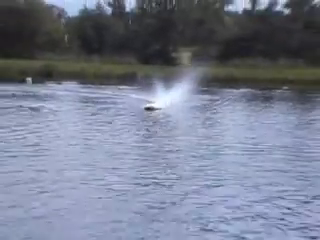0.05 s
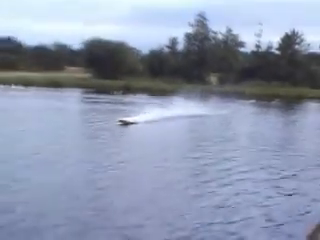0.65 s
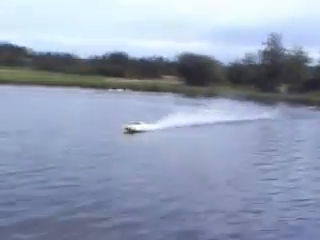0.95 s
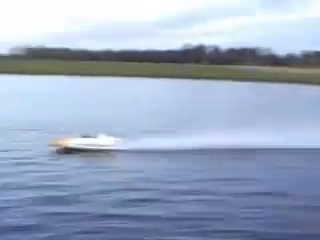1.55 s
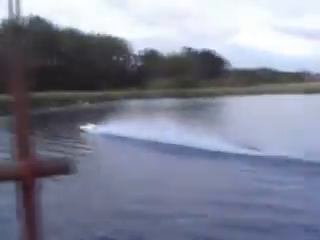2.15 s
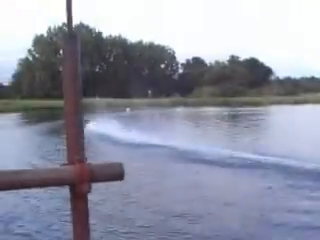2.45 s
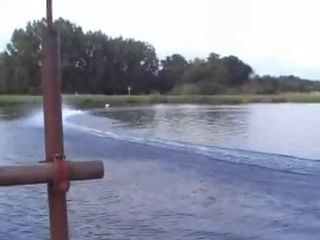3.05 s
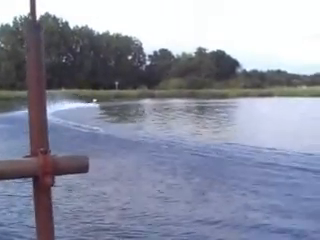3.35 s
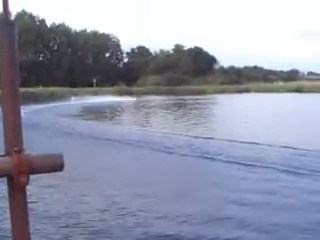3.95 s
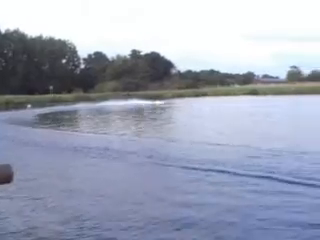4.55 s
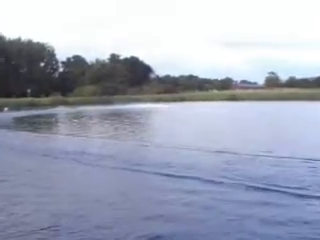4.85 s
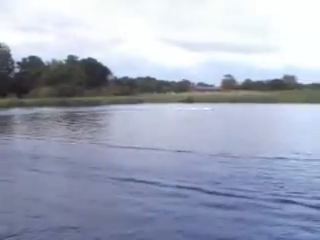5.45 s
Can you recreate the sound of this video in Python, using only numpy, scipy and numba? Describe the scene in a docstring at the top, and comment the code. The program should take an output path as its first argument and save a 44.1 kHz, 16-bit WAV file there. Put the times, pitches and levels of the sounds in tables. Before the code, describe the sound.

High, raspy buzz of a small model boat engine racing across a lake, wavering, brightest as it passes, then lower and fainter.

```python
"""A model speedboat races in across a lake, its two-stroke engine buzzing over a hissing wake. Each firing
cracks out of the exhaust, bounces back from the end of the tuned pipe and scatters in the spray; the revs
jump whenever the propeller skips. At about 1.7 s the boat passes close, at its brightest. Then the pitch
sinks as it turns away and labours, picking up a little at the end. All along the far bank answers faintly
and puffs of breeze brush the microphone."""
import sys
import numpy as np
from scipy import signal
from scipy.fft import rfft, irfft, next_fast_len
from scipy.io import wavfile
from scipy.ndimage import uniform_filter1d, map_coordinates
from numba import njit

SR = 44100
rng = np.random.default_rng(int(sys.argv[2]) if len(sys.argv) > 2 else 0)


def digitize_waveform(pressure):
    """Quantize a signal to 16-bit integers and store it at the path in sys.argv[1].

    Rows of a 2-D input are taken as channels; values are limited to [-1, 1].
    """
    field = np.atleast_2d(pressure).T
    bounded = np.clip(field, -1, 1)
    quanta = np.round(bounded * 32767).astype(np.int16)
    wavfile.write(sys.argv[1], SR, quanta)


N = 247401
TIME = np.arange(N) / SR

# puffs of breeze on the microphone: middle t/s, length/s, level/dB
BREEZE_PUFFS = [(.25, 0.7, -34.5), (1.5, 0.84, -52), (2.867, 0.21, -40), (4.15, 0.5, -60),
                (5.244, 1.5, -43.5)]
# rumble of the breeze: f/Hz, gain/dB
BREEZE_EQ = [(25, -14), (70, 6.5), (125, -17), (170, -17), (300, -17.5)]
# tone of the far bank's echo: f/Hz, gain/dB
BANK_EQ = [(200, -22), (1200, -33), (3000, -30), (5000, -20), (11000, -18)]
# rush of the wake: f/Hz, gain/dB
WAKE_EQ = [(30, -49), (70, -48), (110, -30), (160, -4), (300, -4), (450, 0), (620, 2.5), (850, 0),
           (1300, -3), (2100, -5), (4000, -5), (7000, -30), (11000, -31)]
# a notch that sweeps as the boat swings: t/s, f/Hz, depth/0-1
HOLLOW_SWEEP = [(0, 2380, 0), (.7, 2360, 0.3), (1.0, 2240, .5), (1.15, 1890, .7), (1.45, 1890, 0.24),
                (1.8, 2006, 0.33), (2.25, 1990, 0), (2.5, 2075, .95), (3.45, 2054, 0.98), (3.7, 2117, 0.52),
                (4.1, 2032, 0.93), (4.5, 2144, 0.44), (5.0, 2275, .6), (5.61, 2288, 0)]
# the run: t/s, spray scatter/dB, gas noise/dB, churn in the bark/dB, stern to shore/0-1, wake level/dB
RUN_CUES = [(0, -9, 2.5, -4.5, 0.13, -31.5), (.5, -9, 8, -2.5, 0.28, -29.5),
            (.6, -8.5, 4, -19, 0.28, -35.5), (.75, -13.5, 7, -24, 0.24, -39), (.9, -8.5, 3, -2, 0.26, -31),
            (1.15, -5, 3, -8, 0.28, -32.5), (1.5, -6, 7.5, -12, 0.3, -30), (1.8, -8, 0, -5.5, 0.2, -29.5),
            (2.05, -7.5, -3.5, -16, 0.58, -35.5), (2.3, -2, 2.5, -23, 0.2, -39),
            (2.55, -7.5, -1.5, -11, 0.19, -43), (2.9, -6.5, -2.5, -29, 0.38, -32.5),
            (3.3, -16.5, -2, -30, 0.5, -41.5), (3.55, -4.5, -10, -37, 1, -47),
            (3.68, -8.5, -3, -16, 0.9, -48), (3.85, -8.5, -9, -22.5, 0.9, -47.5),
            (4.18, -9.5, -5, -28, 0.83, -52.5), (4.4, -13, -5, -16, 0.94, -47.5),
            (5.1, -15.5, -1, -6, 0.87, -44), (5.61, -10.5, 1, -5, 0.5, -38.5)]
# firing rate as heard while the propeller grips, falling in the pass and the turn: t/s, f/Hz
FIRING_RATE = [(0.0, 224.6), (0.53, 218.6), (0.72, 226.3), (1.06, 241.4), (1.26, 237.7), (1.46, 245.0),
               (1.72, 244.4), (1.86, 233.4), (2.1, 230.3), (2.3, 233.2), (2.41, 218.8), (2.68, 211.5),
               (2.77, 203.3), (3.02, 194.9), (3.39, 177.0), (3.66, 175.2), (3.82, 181), (4.18, 182.9),
               (4.43, 171.8), (4.74, 177.6), (5.08, 188.2), (5.61, 192.3)]
# the propeller skips clear of a ripple: t/s, rev rise/Hz, recovery/s, exhaust gain/dB
PROP_SKIPS = [(0.084, 6.3, 0.047, 1), (0.163, 3.06, 0.03, 0), (0.246, 7.4, 0.12, -3.5),
              (0.327, 13.7, 0.22, -0.8), (0.555, 11.1, 0.12, 1.5), (0.826, 9.4, 0.048, 1),
              (0.984, 6.16, 0.04, 3), (1.095, 19, 0.067, 0), (1.329, 7, 0.2, 1.5), (1.619, 5.8, 0.071, 0),
              (1.683, 3.35, 0.12, 1.5), (1.89, 7.8, 0.2, -0.5), (2.047, 3.9, 0.049, 0.5),
              (2.595, 3.52, 0.1, 0), (2.72, 4.74, 0.12, 0), (2.84, 5.94, 0.079, -2),
              (2.971, 2.98, 0.053, -1), (3.113, 5.9, 0.136, 0), (3.322, 4.75, 0.041, 1.0),
              (3.443, 4.5, 0.13, 1), (3.568, 5.34, 0.092, 0), (3.744, 8.8, 0.075, 7.5),
              (3.955, 3.84, 0.045, 0), (4.635, 6.3, 0.14, 1.5), (4.803, 6.4, 0.081, 1.0),
              (4.977, 2.42, 0.036, 2.5)]
# single harmonics that whine out as the hull swings: middle t/s, length/s, f/Hz, level/dB
WHINE_CUES = [(0.63, 0.23, 2030, -33), (1.964, 0.2, 3540, -27.5), (1.916, 0.17, 7400, -16),
              (1.8, 0.2, 4200, -17), (2.224, 0.12, 3490, -18), (2.303, 0.11, 4190, -16.5),
              (2.286, 0.22, 4650, -19), (2.93, 0.12, 5300, -31), (4.06, 0.24, 6170, -43),
              (5.22, 0.79, 5110, -42), (4.9, 0.46, 5800, -36), (5.37, 0.52, 1530, -38),
              (5.55, 0.86, 1905, -34)]
# hum of the smooth exhaust flow: t/s, then level/dB for each of harmonics 1-4
DRONE_LEVELS = [(0.0, -25, -50, -25.5, -54), (0.1, -29, -44, -28.5, -63), (0.17, -26, -43, -20.5, -61),
                (0.24, -27, -46, -31, -53), (0.32, -28, -42, -31, -56), (0.39, -26, -37, -23, -50),
                (0.51, -32, -53, -28, -44), (0.58, -30, -47, -44, -63), (0.95, -32, -40, -34, -42.5),
                (1.5, -34.5, -35, -31.5, -60), (1.89, -28.5, -39, -38, -35), (1.98, -39, -45, -32.5, -55),
                (2.25, -45, -34.5, -43, -32), (2.52, -55, -44.5, -42, -52), (2.78, -41.5, -40.5, -38, -59),
                (2.93, -37, -40, -32.5, -33.5), (3.12, -36, -43.5, -40.5, -39), (3.3, -39, -50, -52, -46),
                (3.8, -45, -54.5, -47.5, -48.5), (4.4, -48.5, -56, -47, -48.5),
                (4.9, -53.5, -46.5, -49.5, -63), (5.3, -39.5, -41, -47.5, -51),
                (5.61, -34.5, -38, -62, -75)]
# the bouncing hull shakes the drone: t/s, roughness/0-1
HULL_SHAKE = [(0, .24), (.48, .24), (.62, .08), (.9, .15), (1.3, .22), (1.45, .5), (1.78, .45), (1.9, .14),
              (2.9, .18), (3.3, .08), (5.61, .12)]
# returns inside the tuned pipe: delay/round trips, gain/linear
PIPE_RETURNS = [(0.315, 0.04), (0.843, 0.0083), (0.998, 0.43), (1.158, 0.052), (1.634, 0.037),
                (1.997, 0.059)]
# the water mirrors the exhaust: t/s, delay/ms, gain/linear
WATER_MIRROR = [(0, 0.55, 0.18), (.7, 0.41, 0.058), (.95, 0.27, 0.23), (2.0, 0.31, 0.15),
                (2.42, 0.706, 0.22), (2.9, 0.75, 0.18), (3.9, 0.466, 0.24), (4.6, 0.35, 0.021),
                (5.61, 0.29, 0.089)]
# silencer resonances as heard once the boat has passed: f/Hz, width/Hz, bow gain/dB, stern gain/dB
SILENCER_MODES = [(805, 2300, -14.5, 1.5), (1089.6, 84, 14, -0.5), (1528, 338, 10.5, 19.5),
                  (1908, 150, 8.5, 12.5)]
# tone of the outlet: f/Hz, bow gain/dB, stern gain/dB
OUTLET_EQ = [(300, -69, -36.5), (1490, -51, -23), (2060, -50, -1.5), (2090, -14, -22), (2163, 6.5, -1),
             (2470, -4.5, -1.5), (3280, 0, -2.5), (3710, -5, 0), (4380, -6, 1.5), (5430, -3, 3),
             (5640, -6.5, 5), (6240, -4, 5), (7550, -10, -4), (7760, -30, -9.5), (9900, -48.5, -33.5)]
# modes of the thin pipe wall as heard once the boat has passed: f/Hz, width/Hz, gain/linear
WALL_MODES = [(2740, 160, 0.32), (3190, 240, -0.29), (3810, 140, 0.12), (4226, 150, 0.48), (5400, 55, 0.15),
              (7020, 140, 0.26), (7900, 120, 0.25)]
# a metallic ring in the rasp that slides as the hull swings: t/s, f/Hz, gain/linear
LOW_RING_SWEEP = [(0, 4390, 0.6), (.2, 4660, 1.5), (.3, 5070, 0.46), (.5, 4200, 0.4), (.66, 4950, 0.35),
                  (.82, 4170, 0.24), (.97, 4300, 1.1), (1.1, 3550, 0.79), (1.22, 3400, 1.3),
                  (1.25, 5507, 0.096), (1.3, 5300, 1), (1.4, 4187, 1.37), (1.55, 3860, 0.93),
                  (1.8, 3692, 0.95), (1.95, 3484, 0.24), (2.05, 4140, 1.01), (2.2, 4300, 0.75),
                  (2.32, 4722, 0.98), (2.45, 4200, 0.45), (2.86, 4597, 0.13), (2.9, 4590, 1.7),
                  (3.25, 4750, 0.96), (3.5, 5035, 1.06), (3.85, 4996, 0.27), (4.12, 4776, 0.83),
                  (4.4, 4790, .1), (4.7, 5030, .4), (5.61, 5030, 0.75)]
# a second, shriller ring: t/s, f/Hz, gain/linear
HIGH_RING_SWEEP = [(0, 5800, 0.37), (.35, 6200, .7), (.6, 6090, .7), (.75, 6890, 0.38), (.86, 6300, 0.49),
                   (.96, 6950, 0.76), (1.1, 6600, .6), (1.2, 6150, 0.46), (1.31, 6800, 0.81),
                   (1.45, 5806, 0.37), (1.7, 6450, 0.64), (1.9, 6460, 0.5), (2.08, 5953, 1),
                   (2.25, 5400, .3), (2.38, 5876, 0.91), (2.9, 5900, 1), (3.15, 5860, .7),
                   (3.45, 6340, 0.61), (4.1, 6240, 0.51), (4.45, 7240, 0.51), (4.8, 6300, 0.65),
                   (5.61, 6230, 0.28)]
# tone of the finest crackle, the rushing gas and the bark: f/Hz, gain/dB
SIZZLE_EQ = [(1500, -81), (6000, -18), (7500, 1), (8500, 1.5), (9800, 0.5), (11000, -5), (11800, -14.5)]
GAS_EQ = [(1200, -26), (2400, -13.5), (4200, -6), (6000, -4), (8500, 0)]
BARK_EQ = [(100, -23), (250, -4.5), (800, 19.5), (2150, 12.5), (2600, 6.5)]
# ripples take the top off the water's reflection: f/Hz, gain/dB
MIRROR_EQ = [(7000, 0), (11000, -6)]
# exhaust mix ahead of the skips: t/s, bark level/dB, rasp level/dB, sizzle level/dB
EXHAUST_FADERS = [(0.0, -25.5, -18, -30), (0.109, -26.5, -20.5, -35.5), (0.16, -21, -16.5, -31.5),
                  (0.66, -23, -17, -24), (0.76, -24.5, -19.5, -26), (0.951, -23.5, -16.5, -23.5),
                  (1.5, -24.5, -17.5, -23.5), (1.781, -23.5, -12, -15), (1.93, -23, -8.5, -15.5),
                  (2.2, -24.5, -12.5, -18), (2.28, -23, -15, -22.5), (2.384, -22, -15.5, -22.5),
                  (2.41, -23, -18.5, -31.5), (2.7, -23.5, -21.5, -32.5), (2.87, -25, -19, -31),
                  (2.91, -35, -17.5, -34), (3.15, -27, -19.5, -30), (3.449, -31, -19, -41),
                  (3.899, -34.5, -19.5, -34.5), (4.499, -38.5, -22.5, -33.5), (4.899, -34.5, -22, -33),
                  (5.35, -34.5, -19.5, -32), (5.61, -32.5, -20.5, -29.5)]
# stereo width: f/Hz, side minus mid/dB
SIDE_EQ = [(100, -24), (400, -22), (1100, -21), (3600, -23), (4500, -26), (7000, -36), (8200, -6),
           (9300, -24), (11500, -34)]
# pan, slightly to the right: t/s, left minus right/dB
PAN = [(0, -.55), (1.2, -.3), (3.2, -.6), (3.75, -1.3), (4.25, -1.4), (4.75, -.2), (5.3, -.7)]

RECEDING_TRIP_MS = 2.6  # round trip of a pulse in the tuned pipe, as heard once the boat has passed
APPROACH_SQUEEZE, PASS_AT_S, PASS_FADE_S = .078, 1.71, .55  # racing in shortens that trip by this share
BOB_HZ, BOB_DB, BOB_CREST_S, STRAIGHT_ENDS_S = 2.88, 3.5, .21, 2.0  # the hull porpoises on the straight


def undb(db):
    """Decibels to gain."""
    return 10 ** (np.asarray(db) / 20)


def curves(table):
    """One automation curve per column, in straight ramps over time."""
    times, *columns = np.transpose(table)
    return [np.interp(TIME, times, column) for column in columns]


def swell(middle, length):
    """A rounded fade in and out."""
    return np.maximum(1 - (2 * (TIME - middle) / length) ** 2, 0)


def unit(x):
    """Scale to rms 1."""
    return x / np.sqrt(np.mean(x ** 2))


def steady(x):
    """Ride the gain to hold rms 1 over every few dozen milliseconds."""
    power = uniform_filter1d(uniform_filter1d(x ** 2, size=1800), size=1800)
    return x / np.sqrt(np.maximum(power, 1e-14))


def walk(rate):
    """Smoothed random modulation, rms 1, with `rate` new values a second."""
    hold = int(SR / rate)
    held = np.repeat(rng.standard_normal(4096), hold)[:N]
    return unit(uniform_filter1d(uniform_filter1d(held, hold), hold))


def delay(x, ms):
    """A delay line whose time may move."""
    return map_coordinates(x, [np.arange(N) - ms * SR / 1000], order=3)


def eq(x, points):
    """Minimum-phase equaliser through (f/Hz, gain/dB) points."""
    hz, db = np.transpose(points)
    size = 4096
    grid = np.maximum(np.arange(size // 2 + 1) * SR / size, 1)
    cepstrum = irfft(np.log(undb(np.interp(np.log(grid), np.log(hz), db))))
    cepstrum[1:size // 2] *= 2
    cepstrum[size // 2 + 1:] = 0
    return signal.fftconvolve(x, irfft(np.exp(rfft(cepstrum))))[:N]


@njit
def bandpass(x, hz, width_hz):
    """Sweepable state-variable band-pass."""
    y, band_state, low_state = np.empty(len(x)), 0., 0.
    for i in range(len(x)):
        g, damping = np.tan(np.pi * hz[i] / SR), width_hz / hz[i]
        band = (band_state + g * (x[i] - low_state)) / (1 + g * (g + damping))
        band_state, low_state = 2 * band - band_state, low_state + 2 * g * band
        y[i] = damping * band
    return y


def breeze():
    """Light puffs of wind rumble on the microphone."""
    rumble = unit(eq(rng.standard_normal(N), BREEZE_EQ))
    return rumble * sum(undb(db) * swell(at, length) for at, length, db in BREEZE_PUFFS)


def far_bank(boat, t60_s=2.3, predelay_s=.04):
    """A faint, thin echo from the trees round the lake."""
    t = TIME[:SR]
    tail = rng.standard_normal(SR) * undb(-60 * t / t60_s) * (t > predelay_s)
    echo = signal.fftconvolve(boat, tail / np.sqrt(np.sum(tail ** 2)))[:N]
    return eq(echo, BANK_EQ)


def wake(level_db, surge_db=1.8):
    """Thrown water rushes unevenly as the hull skips over the ripples."""
    rush = unit(eq(rng.standard_normal(N), WAKE_EQ))
    return rush * undb(level_db + surge_db * walk(14))


def hollow(boat):
    """A moving notch scoops out the upper mids as the boat swings."""
    hz, depth = curves(HOLLOW_SWEEP)
    return boat - np.clip(depth, 0, 1) * bandpass(boat, hz, width_hz=340.)


def whines(turns, firing_hz, waver_db=2):
    """For a moment the engine harmonic nearest each cued pitch sings out."""
    tones = 0
    for at, length, hz, db in WHINE_CUES:
        harmonic = np.round(hz / np.interp(at, TIME, firing_hz))
        envelope = swell(at, length) * undb(db + waver_db * walk(40.9))
        tones = tones + envelope * np.sin(2 * np.pi * harmonic * turns)
    return np.sqrt(2) * tones


def drone(turns, scatter_db):
    """The pulsing exhaust flow hums on four low harmonics that throb and shake as the hull bounces."""
    levels = curves(DRONE_LEVELS)
    on_straight = np.clip((STRAIGHT_ENDS_S - TIME) * 20, 0, 1)
    levels[0] += BOB_DB * on_straight * np.cos(2 * np.pi * BOB_HZ * (TIME - BOB_CREST_S))
    waver_db = 3.2 * undb(scatter_db / 2)  # deeper in broken water
    rough = curves(HULL_SHAKE)[0]
    # flat out, strong and weak firings alternate: a faint sub-octave
    tones = undb(-48) * swell(middle=1.4, length=.97) * walk(25) * np.sin(np.pi * turns)
    for harmonic, db in enumerate(levels, 1):
        shake = (1 + rough * (walk(110) + 1j * walk(70))) / np.sqrt(1 + 2 * rough ** 2)
        tone = np.imag(shake * np.exp(2j * np.pi * harmonic * turns))
        tones += undb(db + waver_db * walk(21.85)) * tone
    return np.sqrt(2) * tones


def propeller_skips(rise_s=.053):
    """The propeller loses its grip: extra revs (Hz) and a briefer change in exhaust level (dB)."""
    races = np.array([np.interp(TIME - at, [-rise_s, 0, recovery], [0, 1, 0])
                      for at, _, recovery, _ in PROP_SKIPS])
    _, rise_hz, _, gain_db = np.transpose(PROP_SKIPS)
    return rise_hz @ races, gain_db @ races ** 2


def scatter(x, spread_ms, rate, taps=16):
    """Short reflections off hull, ripples and spray, each fading in and out."""
    lags = (np.arange(taps) + rng.random(taps)) / taps
    return unit(sum(np.roll(x, int(lag * spread_ms * SR / 1000) + 2) * walk(rate) * np.exp(-lag)
                    for lag in lags))


def firings(turns, jitter_ms, spread_db):
    """One sharp pressure pulse per engine turn, each a little different in timing and punch."""
    timing, punch = rng.standard_normal((1400, 2))[:int(turns[-1])].T
    centres = np.interp(np.arange(len(timing)) + 1, turns, np.arange(N)) + timing * jitter_ms * SR / 1000
    samples = centres.astype(int)[:, None] + np.arange(-7, 9)
    offset = samples - centres[:, None]
    clicks = np.sinc(offset) * np.sinc(offset / 8) * undb(spread_db * punch[:, None])
    return unit(np.bincount(np.clip(samples, 0, N - 1).ravel(), clicks.ravel(), N))


def tuned_pipe(blast, trip_ms):
    """The blast with its returns from inside the pipe, then its bounce off the water."""
    piped = unit(blast + sum(gain * delay(blast, share * trip_ms) for share, gain in PIPE_RETURNS))
    mirror_ms, mirror_gain = curves(WATER_MIRROR)
    return unit(piped + mirror_gain * delay(eq(piped, MIRROR_EQ), mirror_ms))


def exhaust_crack(turns, trip_ms, scatter_db, gas_db):
    """Firings and bright gas noise cross the pipe and scatter; returns the crack and the raw gas puffs."""
    pulses = firings(turns, jitter_ms=.008, spread_db=.6)
    # gas rushes while the port is open and never quite stops
    puffs = (np.exp(-(turns % 1) / .25) + .5) * rng.standard_normal(N)
    direct = tuned_pipe(pulses + undb(gas_db) * unit(eq(puffs, GAS_EQ)), trip_ms)
    off_spray = undb(scatter_db) * scatter(direct, spread_ms=1.7, rate=18)
    off_hull = undb(-11) * scatter(direct, spread_ms=4.5, rate=11)
    return direct + off_spray + off_hull, puffs


def silencer_bark(turns, trip_ms, doppler, puffs, churn_db, astern):
    """The even body of each blast, roughened by churning water at the outlet, rings the silencer."""
    even = tuned_pipe(firings(turns, jitter_ms=.003, spread_db=.25), trip_ms)
    churn = .8 * unit(puffs) + 2.2 * scatter(even, spread_ms=2.2, rate=20)
    body = even + undb(churn_db) * churn
    bark = 0
    for k, (hz, width, bow_db, stern_db) in enumerate(SILENCER_MODES):
        gain = (-1) ** k * undb(bow_db + astern * (stern_db - bow_db))
        bark = bark + gain * bandpass(body, hz * doppler, float(width))
    return eq(bark, BARK_EQ)


def outlet_rasp(crack, doppler, astern):
    """The crack crossfades from bow tone to stern tone, rings the pipe wall and gains a metallic edge."""
    from_bow = eq(crack, [(hz, db) for hz, db, _ in OUTLET_EQ])
    from_stern = eq(crack, [(hz, db) for hz, _, db in OUTLET_EQ])
    rasp = (1 - astern) * from_bow + astern * from_stern
    rasp += sum(gain * bandpass(rasp, hz * doppler, float(width)) for hz, width, gain in WALL_MODES)
    for hz, gain in (curves(LOW_RING_SWEEP), curves(HIGH_RING_SWEEP)):
        rasp += gain * bandpass(rasp, hz, width_hz=270.)
    return rasp


def exhaust(turns, scatter_db, gas_db, churn_db, astern, flutter_db=.6):
    """The lead voice: bark, rasp and sizzle, each fluttering as the outlet jiggles on the ripples."""
    closing = .5 - .5 * np.tanh((TIME - PASS_AT_S) / PASS_FADE_S)
    trip_ms = RECEDING_TRIP_MS * (1 - APPROACH_SQUEEZE * closing)
    doppler = RECEDING_TRIP_MS / trip_ms  # lifts the resonances on the way in
    crack, puffs = exhaust_crack(turns, trip_ms, scatter_db, gas_db)
    bark = silencer_bark(turns, trip_ms, doppler, puffs, churn_db, astern)
    rasp = outlet_rasp(crack, doppler, astern)
    sizzle = eq(crack, SIZZLE_EQ)
    return sum(steady(layer) * undb(db + flutter_db * walk(18))
               for layer, db in zip((bark, rasp, sizzle), curves(EXHAUST_FADERS)))


def scene():
    """Boat, echo and breeze in the narrow image of a closely spaced microphone pair."""
    scatter_db, gas_db, churn_db, astern, wake_db = curves(RUN_CUES)
    skip_hz, skip_db = propeller_skips()
    # between skips the propeller still bites unevenly, more so in broken water
    wobble = .00301 * undb(scatter_db / 2) * walk(35)
    firing_hz = (curves(FIRING_RATE)[0] + skip_hz) * (1 + wobble)
    turns = np.cumsum(firing_hz) / SR
    engine = exhaust(turns, scatter_db, gas_db, churn_db, astern) * undb(skip_db)
    engine = engine + drone(turns, scatter_db) + whines(turns, firing_hz)
    boat = hollow(engine + wake(wake_db))
    mid = boat + far_bank(boat) + breeze()
    # width comes from a quiet copy, a quarter-cycle out of phase
    side = eq(np.imag(signal.hilbert(mid, next_fast_len(N)))[:N], SIDE_EQ)
    pan_db = curves(PAN)[0]
    return np.array([(mid + side) * undb(pan_db / 2), (mid - side) * undb(-pan_db / 2)])


def record(dry, ceiling=.76, low_cut_hz=85, high_cut_hz=11700):
    """Round off the highest peaks, thin the bass and cut the top."""
    rounded = dry / (1 + (dry / ceiling) ** 4) ** (1 / 4)
    low_cut = signal.butter(3, low_cut_hz, "high", fs=SR, output="sos")
    thin = signal.sosfiltfilt(low_cut, rounded, padtype="even", padlen=SR // 10)
    high_cut = signal.firwin(401, high_cut_hz, window="blackman", fs=SR)
    return signal.fftconvolve(thin, high_cut[None], "same")


dry = scene()
out = record(dry)
digitize_waveform(out)
```